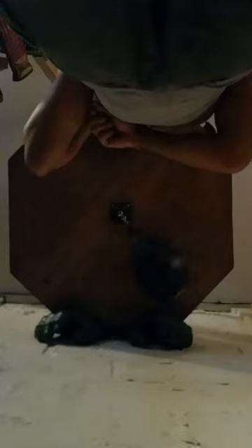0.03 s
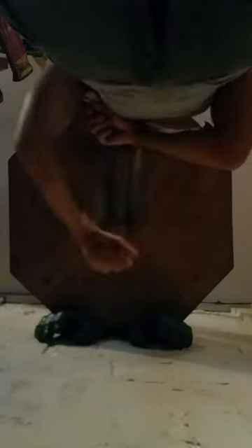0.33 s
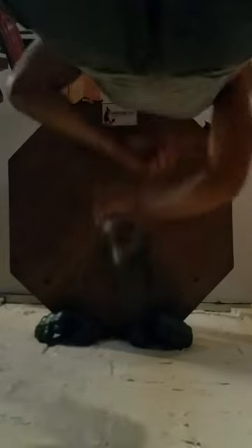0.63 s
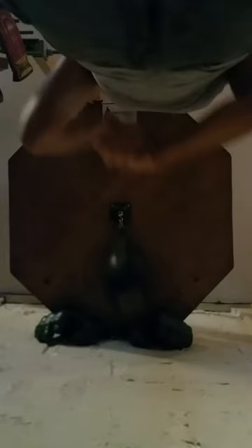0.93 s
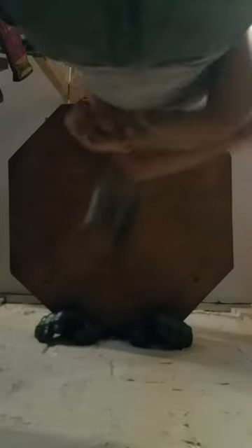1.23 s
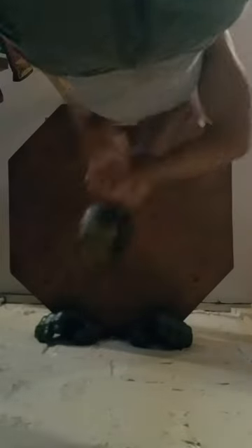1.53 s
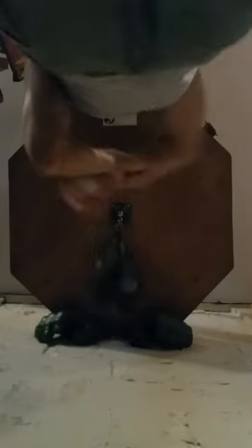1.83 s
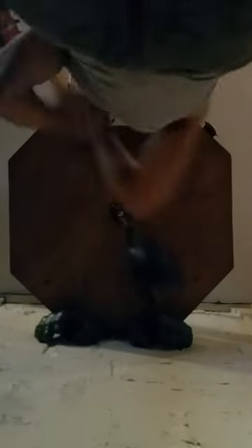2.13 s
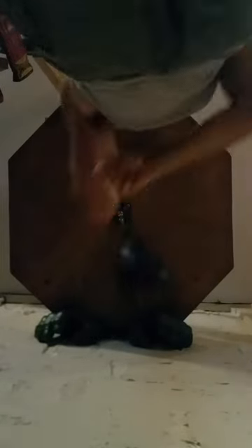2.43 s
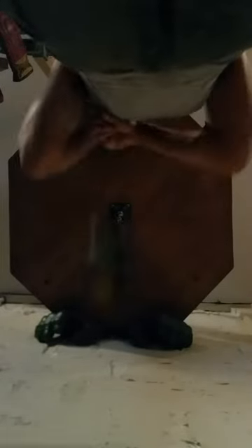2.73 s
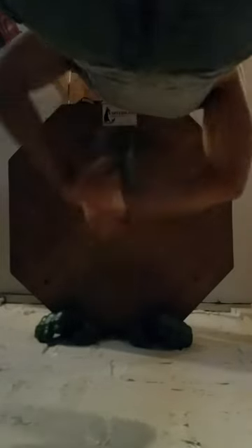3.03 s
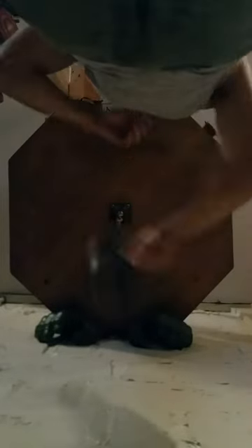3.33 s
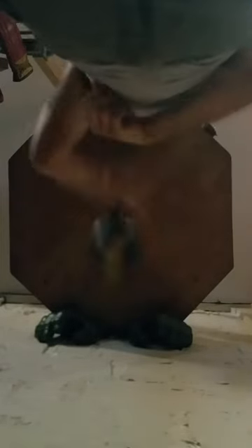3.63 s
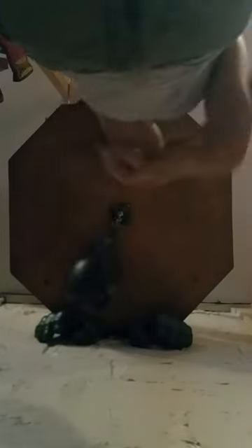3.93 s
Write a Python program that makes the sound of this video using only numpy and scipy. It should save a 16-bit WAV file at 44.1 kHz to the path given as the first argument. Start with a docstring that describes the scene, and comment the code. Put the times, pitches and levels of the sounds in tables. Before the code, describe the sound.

A speed bag punched rapidly, drumming against its wooden board in a small room.

```python
"""In a small hard-walled room, a speed bag is punched in a quick rolling rhythm under its wooden board.
Each fist makes the air inside the bag ring. A moment later the leather slaps the board, which booms
and knocks, and the swivel that holds the bag clacks. Between punches the bag swings back against
the board more softly. Two glancing blows snap dryly, and the room rumbles faintly behind it all."""
import sys
import numpy as np
from scipy import signal
from scipy.fft import rfft, irfft
from scipy.io import wavfile

SR = 44100
rng = np.random.default_rng(int(sys.argv[2]) if len(sys.argv) > 2 else 0)


def wav_out(sig):
    """Save sig, one row per channel (or a flat mono array), as 16-bit PCM at SR to the path in sys.argv[1]."""
    wavfile.write(sys.argv[1], SR, np.round(np.clip(np.atleast_2d(sig).T, -1, 1) * 32767).astype(np.int16))


N = 176400  # 4 s


def gain(db):
    """Turn decibels into a number to multiply a sound by."""
    return 10 ** (np.asarray(db) / 20)


def unit_energy(x):
    """Scale a sound so that its energy is 1."""
    return x / np.sqrt(np.sum(x ** 2))


def read_curve(points, hz):
    """Read between (frequency, value) points, giving each octave equal space."""
    freqs, values = np.array(points).T
    return np.interp(np.log(hz + 1), np.log(freqs), values)


def convolve(x, response):
    """Let every sample of a sound set off its own copy of a response."""
    return signal.fftconvolve(np.atleast_2d(x), np.atleast_2d(response), axes=1)[:, :N]


def tone(points, size=2048):
    """A click with the given balance of bass and treble, for use as a filter."""
    hz = np.arange(size // 2 + 1) * SR / size
    cepstrum = irfft(np.log(gain(read_curve(points, hz))))
    cepstrum[1:size // 2] *= 2  # this line and the next move the energy to the start
    cepstrum[size // 2 + 1:] = 0
    return unit_energy(irfft(np.exp(rfft(cepstrum))))


def ring(notes):
    """The notes of a tapped object, each dying away by 60 dB in its fade time."""
    t = np.arange(SR) / SR
    return sum(gain(db) * np.cos(2 * np.pi * hz * t) * np.exp(-np.log(1000) * t / fade_s)
               for hz, db, fade_s in notes)


def add(track, start_s, sound):
    """Mix a sound into a track at the given time."""
    i = max(int(start_s * SR), 0)
    track[i:i + len(sound)] += sound[:len(track) - i]


def contacts(times, levels_db, decay_s, hold_s=0, size=2048):
    """Two things meet: one short crunch of fresh noise each time."""
    track = np.zeros(N)
    fade = np.exp(-np.maximum(np.arange(size) / SR - hold_s, 0) / decay_s)
    for start_s, db, noise in zip(times, levels_db, rng.standard_normal((len(times), size))):
        even = irfft(np.exp(1j * np.angle(rfft(noise * fade))))  # all frequencies equally strong
        add(track, start_s, gain(db) * unit_energy(even * np.sqrt(fade)))
    return track


# how long the room's echo takes to fall by 60 dB (f/Hz, fade/s)
ROOM_FADES = [(150, 1), (400, 0.46), (1200, 0.58), (3000, 0.5), (7000, 0.4), (14000, 0.33)]
def room(x, early_db, tail_db, size=32768):
    """Hard walls follow a sound with a burst of early echoes and a smooth, fading tail."""
    early_s, onset_s, wide_hz = 0.012, 0.00088, 694
    t = np.arange(size) / SR
    hz = np.arange(size // 2 + 1) * SR / size
    mid, side = rfft(rng.standard_normal((2, size)))
    width = hz ** 2 / (hz ** 2 + wide_hz ** 2)  # the bass is alike in both ears
    echoes = (mid + width * side * np.array([[1], [-1]])) / np.sqrt(1 + width ** 2)
    centres = np.log([f for f, _ in ROOM_FADES])
    tail = 0
    for band, (_, fade_s) in zip(np.eye(len(centres)), ROOM_FADES):
        share = np.interp(np.log(hz + 1), centres, band)
        tail += irfft(echoes * share) * np.exp(-np.log(1000) * t / fade_s)
    onset = 1 - np.exp(-t / onset_s)
    early = unit_energy(irfft(echoes) * np.exp(-t / early_s) * onset)
    response = np.sqrt(2) * (gain(early_db) * early + gain(tail_db) * unit_energy(tail * onset))
    response[:, 0] += 1  # the sound that arrives directly
    return convolve(x, response)


# tone of the quiet room (f/Hz, relative level/dB)
BACKGROUND_TONE = [(18, -17), (30, -6), (71, -1.5), (153, -15), (319, -10), (461, -12.5), (616, -12.5),
                   (889, -20), (2830, -30.5), (16000, -55.5)]
def background():
    """The room's faint, steady rumble and hiss."""
    mid, side = convolve(rng.standard_normal((2, N)), tone(BACKGROUND_TONE))
    return gain(-40.5) * (mid + 0.51 * side * np.array([[1], [-1]]))


# glancing blows (t/s, crack level/dB, ring f/Hz, ring level/dB, thud level/dB); levels are relative
GLANCING_BLOWS = [(0.3302, -26.5, 2310, -22, -11.5), (2.0198, -21.5, 1320, -16.5, -20)]
# tone of their dull thud (f/Hz, relative level/dB)
THUD_TONE = [(80, -20), (170, 13), (450, 0), (900, -18), (3000, -54)]
# tone of cracking leather (f/Hz, relative level/dB)
LEATHER_TONE = [(400, -35), (1200, 3.5), (2300, 5.5), (3000, 5), (4000, 0.5), (6000, 0), (7400, -2.5),
                (8600, -12.5), (12000, -12), (16000, -20)]
def glancing_snaps():
    """A glancing blow snaps dryly: a bright crack, a dull thud and a brief ring."""
    snaps = 0
    for start_s, crack_db, hz, ring_db, thud_db in GLANCING_BLOWS:
        tap = contacts([start_s], [0], decay_s=0.0024)
        snaps += gain(crack_db) * convolve(tap, tone(LEATHER_TONE))
        snaps += gain(thud_db) * convolve(tap, tone(THUD_TONE))
        snaps += gain(ring_db + 3) * convolve(tap, unit_energy(ring([(hz, 0, 0.036)])))
    return room(snaps, early_db=-10, tail_db=-9) * gain(18.5)


# a fist meets the bag (t/s, relative level/dB)
FIST_HITS = [(0.0952, -25.5), (0.228, -32.5), (0.366, -17.5), (0.487, -21.5), (0.635, -23.5),
             (0.765, -24.5), (0.868, -23.5), (1.006, -21.5), (1.136, -20.5), (1.252, -21), (1.394, -23),
             (1.548, -32), (1.687, -24), (1.823, -17.5), (1.935, -28.5), (2.067, -17), (2.24, -23),
             (2.393, -17), (2.546, -14), (2.641, -24), (2.742, -23.5), (2.871, -24.5), (2.982, -16),
             (3.069, -22.5), (3.17, -31.5), (3.305, -25.5), (3.414, -19.5), (3.521, -23.5), (3.661, -29),
             (3.782, -24), (3.888, -22)]
# low notes of the board and its frame (f/Hz, relative level/dB, fade/s)
BOARD_NOTES = [(56.6, -38, 1), (89.26, -16, 0.65), (105.4, -19.5, 0.51), (126.4, -16, .32),
               (142.9, -14.5, 0.24), (184, -37, 0.1), (305.9, -22.5, 0.48)]
def swivel_tugs():
    """Each punch pulls on the swivel and makes the board rumble softly."""
    times, db = np.array(FIST_HITS).T
    pull = contacts(times, db + 2.5, decay_s=0.0026)
    pull = signal.sosfilt(signal.butter(4, 330, fs=SR, output="sos"), pull)
    return room(convolve(pull, ring(BOARD_NOTES)), early_db=-21, tail_db=-7)


# tone of a fist landing on the bag (f/Hz, relative level/dB)
POCK_TONE = [(190, -27), (330, 1.5), (476, -2.5), (646, -10.5), (1100, -5.5), (1270, -2.5), (1670, -15.5),
             (2360, -16.5), (2580, -23.5), (3140, -26), (3500, -17), (4550, -68), (7700, -120)]
# notes of the air inside the bag (f/Hz, relative level/dB, fade/s)
AIR_NOTES = [(373.7, -1.5, 0.16), (1090, -8.5, 0.13), (1187, -10, 0.065)]
def fists():
    """A soft fist sinks into the bag with a hollow pock and sets the air inside ringing."""
    times, db = np.array(FIST_HITS).T
    give_s, hold_s = 0.0039, 0.013  # the fist gives way, so the contact lasts a while
    pock = convolve(contacts(times, db, give_s, hold_s), tone(POCK_TONE))
    pock = signal.sosfilt(signal.butter(3, [328, 2600], "band", fs=SR, output="sos"), pock)
    air = convolve(contacts(times, db - 3.5, give_s, hold_s), unit_energy(ring(AIR_NOTES)))
    air = signal.sosfilt(signal.butter(2, 1500, fs=SR, output="sos"), air)
    return room(pock + air, early_db=-12, tail_db=-4) * gain(25.5)


CLACK_DELAY_S, CLACK_DB = 0.0105, -13  # the swivel clacks as the board swings back
# the bag hits the board, rebounds included (t/s, then relative level/dB of boom, knock and slap)
BAG_HITS = [(0.1568, -25.5, -33.5, -47), (0.3301, -14, -31, -55), (0.379, -3, -15.5, -28.5),
            (0.5041, -9, -21, -29), (0.6584, -12, -22, -29), (0.7361, -12.5, -25, -68),
            (0.7775, -3, -18, -26.5), (0.8877, -7, -24, -27), (1.0245, -9.5, -22, -33.5),
            (1.101, -15.5, -30, -64), (1.1474, -4.5, -18, -28), (1.2676, -9.5, -26, -28),
            (1.4188, -11.5, -26.5, -34), (1.5035, -16, -34, -62), (1.5729, -8.5, -21.5, -33),
            (1.6464, -18, -37, -49), (1.706, -6, -21.5, -28.5), (1.7773, -15.5, -27, -51),
            (1.84, -5.5, -20, -30.5), (1.8949, -17.5, -27.5, -35), (1.9508, -10.5, -20, -35.5),
            (2.0194, -12, -29.5, -33.5), (2.0908, -12.5, -23.5, -34), (2.1877, -18, -33.5, -52),
            (2.2653, -13, -23.5, -30.5), (2.3435, -14.5, -39, -46), (2.36, -16, -31, -55),
            (2.4143, -10, -22, -30.5), (2.4991, -12, -25.5, -41), (2.5586, -3.5, -15.5, -29.5),
            (2.6151, -11.5, -20.5, -59), (2.629, -35, -25.5, -58), (2.6499, -1.5, -11.5, -25),
            (2.7537, -7, -23.5, -35), (2.8865, -11, -24.5, -34), (2.95, -11.5, -25.5, -53),
            (2.9926, -5, -21.5, -30.5), (3.0407, -14, -23.5, -52), (3.077, -4, -15.5, -28.5),
            (3.1845, -10.5, -25.5, -32), (3.3213, -9.5, -25.5, -33.5), (3.384, -13.5, -27, -45),
            (3.4227, -5.5, -19.5, -29.5), (3.536, -14, -25, -32.5), (3.678, -16.5, -29, -40.5),
            (3.7503, -15.5, -33, -58), (3.792, -4, -18.5, -28), (3.9019, -9.5, -28.5, -38.5)]
def leather_slap():
    """Leather cracks against the wood, and the swivel clacks after it."""
    times, _, _, db = np.array(BAG_HITS).T
    cracks = contacts(times, db, decay_s=0.0012)
    clacks = contacts(times + CLACK_DELAY_S, db + CLACK_DB, decay_s=0.003)
    return room(convolve(cracks + clacks, tone(LEATHER_TONE)), early_db=-4, tail_db=3) * gain(26)


# tone of the struck wood (f/Hz, relative level/dB)
WOOD_TONE = [(60, -20), (120, -1.5), (220, 0), (320, 2.5), (480, -1.5), (780, -0.5), (1250, -2.5),
             (1550, -9), (2300, -8), (3500, -16), (6000, -33)]
def board_knock():
    """The board's many higher notes blur into a short wooden knock."""
    times, _, db, _ = np.array(BAG_HITS).T
    taps = contacts(times, db, decay_s=0.0016)
    clacks = contacts(times + CLACK_DELAY_S, db + CLACK_DB, decay_s=0.0085)
    return room(convolve(taps + clacks, tone(WOOD_TONE)), early_db=-7, tail_db=0.5) * gain(24.5)


# nearby surfaces and the far wall send the boom back (delay/s, strength as a factor)
WALL_ECHOES = [(.006, .9), (.0071, 0.75), (.0086, .8), (.068, .25)]
def board_boom():
    """The bag's push bends the board, which booms with its low notes."""
    contact_s, spot_db = 0.0012, 2.5
    push = np.sin(np.pi * np.minimum(np.arange(SR // 100) / SR / contact_s, 1))
    arrivals = np.zeros(SR // 8)
    for delay_s, strength in [(0.0017, 1)] + list(WALL_ECHOES):  # direct sound, then echoes
        add(arrivals, delay_s, -strength * push / push.sum())
    notes = convolve([ring([note]) for note in BOARD_NOTES], arrivals)
    # each blow lands on another spot, which mixes the notes a little differently
    mixes = gain(spot_db * rng.standard_normal((len(BAG_HITS), len(notes))))
    booms = np.zeros(N)
    for (start_s, db, _, _), mix in zip(BAG_HITS, mixes):
        add(booms, start_s - contact_s / 2, gain(db) * mix @ notes)
    return booms * gain(2)


def scene():
    """Fists, bag and board sound together in the room."""
    low_board = board_boom() + swivel_tugs()
    return low_board + fists() + board_knock() + leather_slap() + glancing_snaps() + background()


# how much the microphones favour one side (f/Hz, left minus right level/dB)
SIDE_BALANCE = [(120, -2), (250, -2.4), (500, -0.1), (1000, 1.5), (2000, -2.3), (4000, 1), (8000, 4.9),
                (12000, 4)]
def record(dry):
    """Two unequal microphones hear the room; deep bass, overloud peaks and the top treble are cut."""
    left_lag_s, low_cut_hz, top_hz = 0.00007, 40, 16000
    size = 2 * N
    hz = np.arange(N + 1) * SR / size
    sides = np.array([[0.5], [-0.5]])  # left and right each take half, in opposite directions
    balance = gain(sides * read_curve(SIDE_BALANCE, hz))
    lag = np.exp(-2j * np.pi * hz * left_lag_s * sides)
    heard = irfft(rfft(dry, size) * balance * lag)[:, :N]
    heard = signal.sosfilt(signal.butter(2, low_cut_hz, "high", fs=SR, output="sos"), heard)
    return signal.sosfilt(signal.ellip(8, 0.2, 70, top_hz, fs=SR, output="sos"), np.clip(heard, -1, 1))


dry = scene()
out = record(dry)
wav_out(out)
```